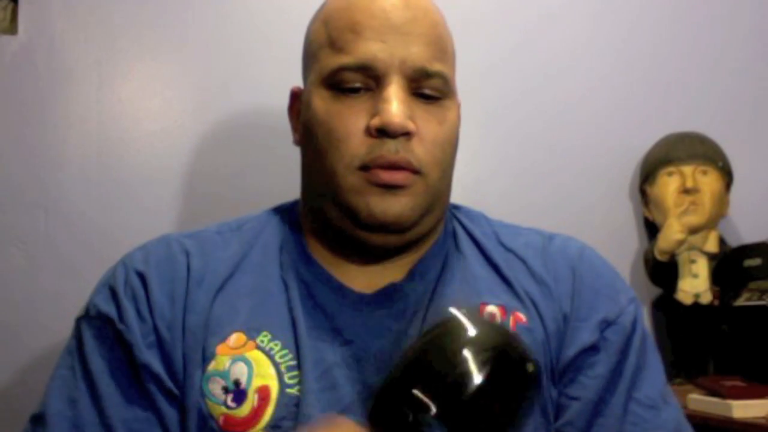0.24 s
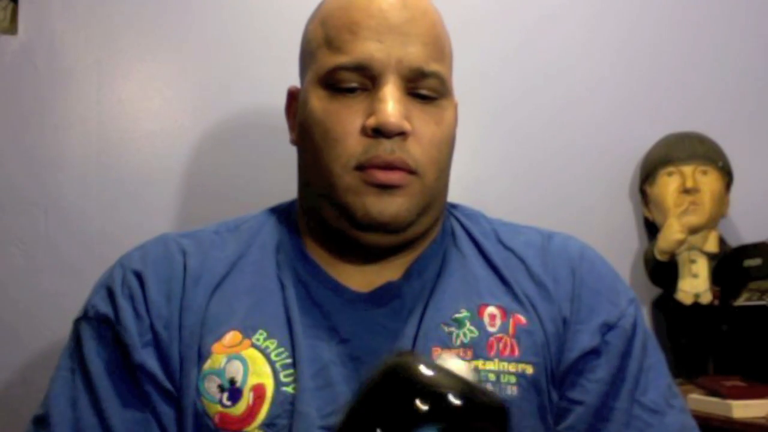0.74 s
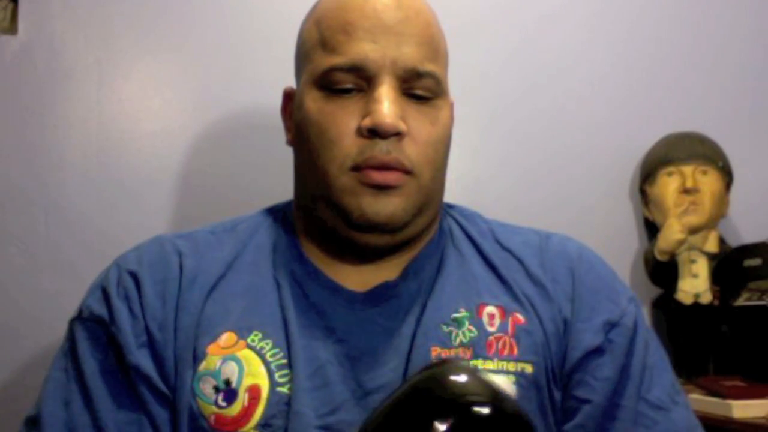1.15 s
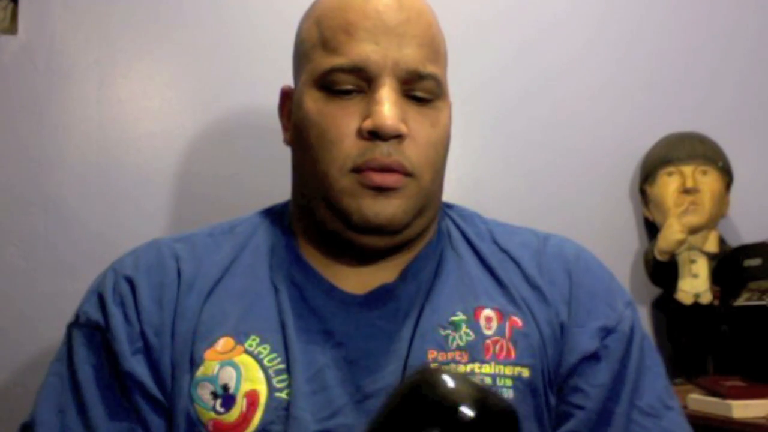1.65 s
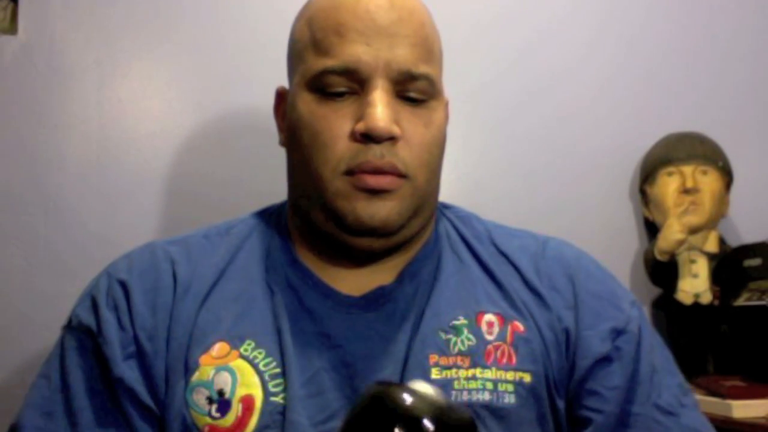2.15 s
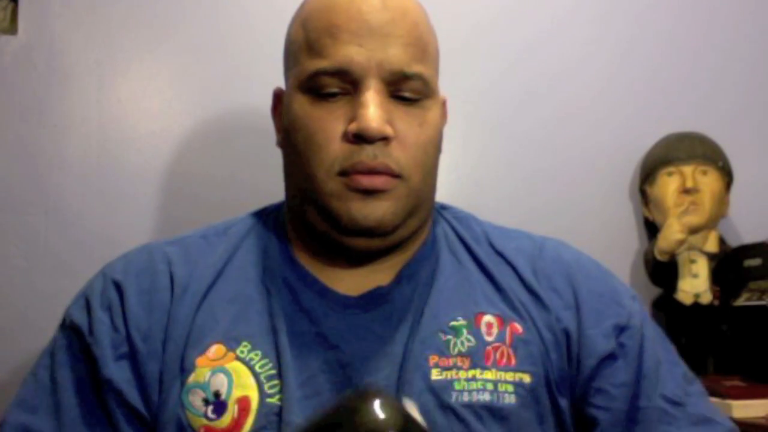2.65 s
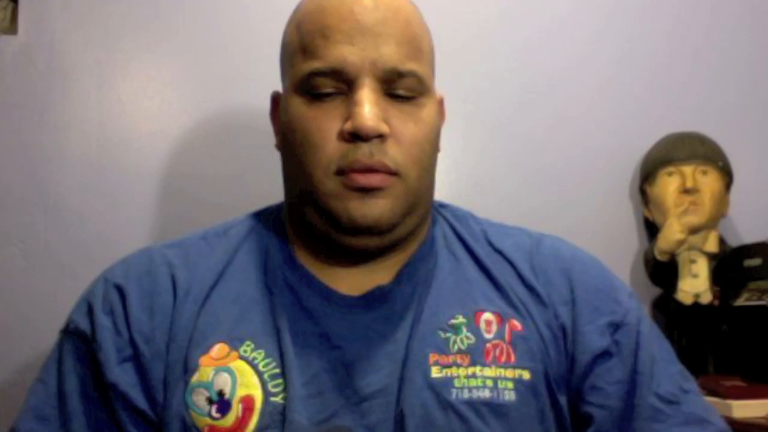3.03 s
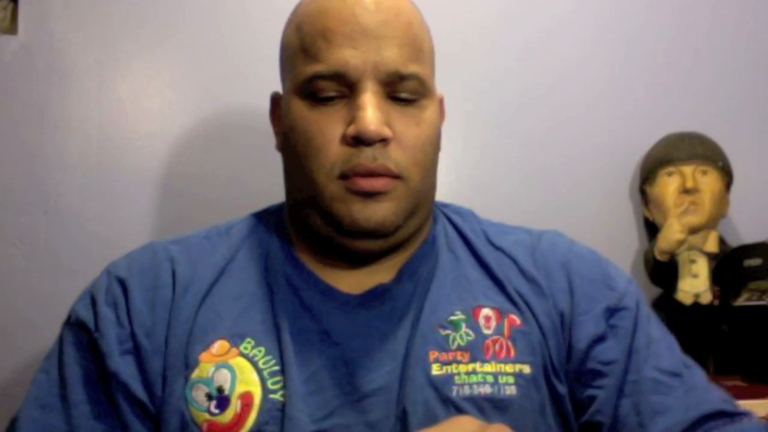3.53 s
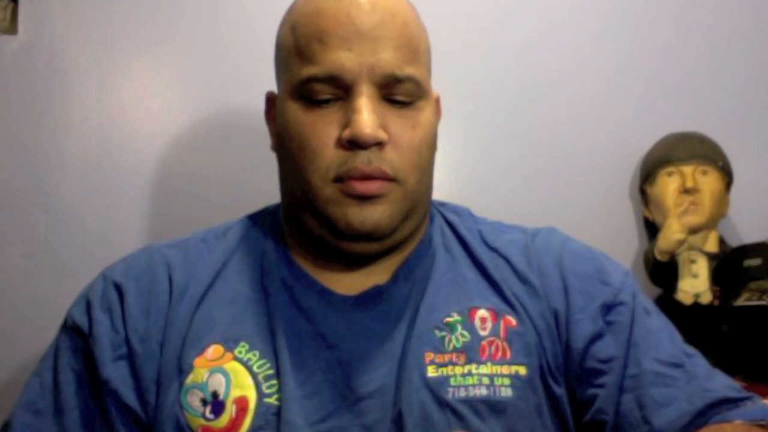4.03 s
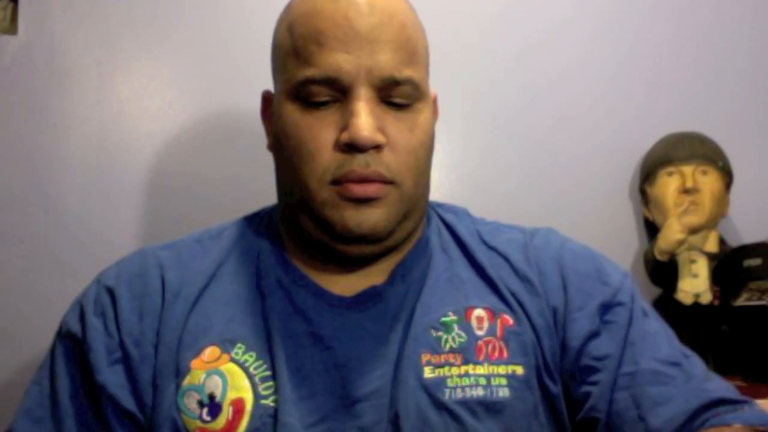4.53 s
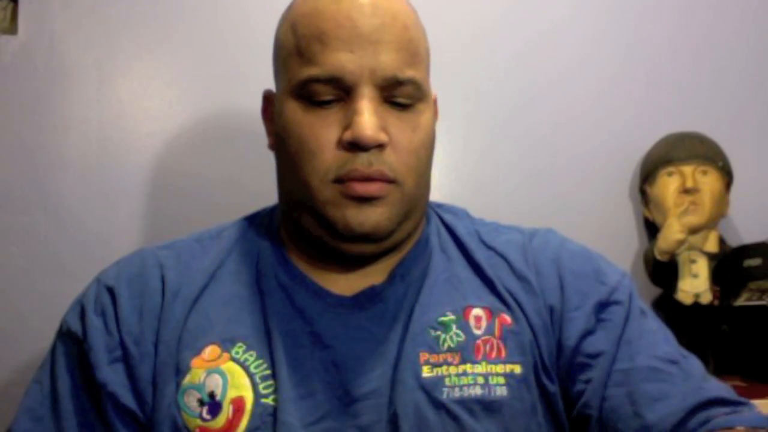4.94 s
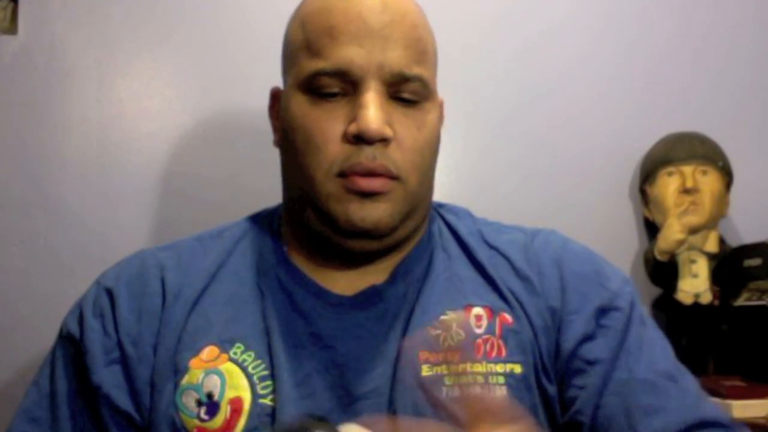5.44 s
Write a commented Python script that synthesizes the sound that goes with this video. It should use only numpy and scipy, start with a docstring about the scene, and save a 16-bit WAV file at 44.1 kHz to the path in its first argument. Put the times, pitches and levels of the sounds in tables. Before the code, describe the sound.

Hands rub and twist a balloon, its skin popping, squeaking briefly and drumming hollowly, in irregular bursts over very faint hiss and hum.

```python
"""A rustling stroke over faint hum and hiss opens a scene of hands twisting a latex balloon in a small room.
The skin sticks and lets go: single snaps, short creaks and squeaks of regular slips, and a rustle of tiny
slips under each stroke. Each slip rings the skin in resonances. Pushes and strokes drum the air chambers
inside, and a hand bumps the desk with a dull decaying tone. A close computer microphone hears it all."""
import sys
import numpy as np
from scipy import signal
from scipy.fft import rfft, irfft, next_fast_len
from scipy.io import wavfile
from scipy.ndimage import map_coordinates

SR = 44100
rng = np.random.default_rng(int(sys.argv[2]) if len(sys.argv) > 2 else 0)


def wav_out(sig):
    """Save sig, one row per channel (or a flat mono array), as 16-bit PCM at SR to the path in sys.argv[1]."""
    wavfile.write(sys.argv[1], SR, np.round(np.clip(np.atleast_2d(sig).T, -1, 1) * 32767).astype(np.int16))


N = 250498

# spectrum of the bright slip noise: frequency_hz, density_db (relative, per Hz)
FIZZ_SPECTRUM = [(2000, -11.5), (3500, -10), (4300, -5.5), (6000, -9), (9000, -15), (12000, -17.5),
                 (16000, -26.5)]
# pushes on the air inside: start_s, level_db (peak, before room and microphone), pitch_hz (favoured chamber)
PUSHES = [(0.108, -27, 500), (0.233, -4, 444), (0.429, -16.5, 290), (0.687, -22, 460), (0.787, -25, 388),
          (0.825, -26, 570), (0.898, -29.5, 480), (1.327, -20.5, 518), (1.415, -29, 470), (1.484, -15, 509),
          (1.52, -16.5, 416), (1.805, -21, 462), (2.195, -5.5, 436), (2.452, -19.5, 368), (2.743, -28, 301),
          (2.854, -29, 457), (2.95, -38.5, 321), (3.092, -31, 327), (3.322, -31.5, 550), (3.483, -33, 593),
          (3.79, -28.5, 560), (4.39, -26, 588), (4.786, -23, 549), (4.896, -19, 628), (5.066, -18.5, 526),
          (5.272, -27.5, 535), (5.548, -35.5, 363), (5.562, -40.5, 387), (5.605, -31.5, 470),
          (5.674, -18.5, 553)]


def amp(db):
    """Decibels to linear gain."""
    return 10 ** (np.asarray(db) / 20)


def unit(x):
    """Scale to an RMS of 1."""
    return x / np.sqrt(np.mean(x ** 2) + 1e-20)


def along(points, hz):
    """Read a curve of (Hz, value) points on a log frequency axis."""
    f, v = np.transpose(points)
    return np.interp(np.log(hz + 1), np.log(f + 1), v)


def wobble(rate):
    """A smooth random curve, rate knots a second."""
    knots = rng.standard_normal(int(N * rate / SR) + 4)
    return map_coordinates(knots, [np.arange(N) * rate / SR])


def filtered(x, response):
    """Filter x by a complex response of frequency."""
    m = next_fast_len(len(x) + SR // 8)
    return irfft(rfft(x, m) * response(np.fft.rfftfreq(m, 1 / SR)), m)[:len(x)]


def mode(f, hz, width_hz):
    """One causal resonance of gain 1 at its centre."""
    return 1j * f * width_hz / (hz * hz - f * f + 1j * f * width_hz)


def add(track, s, sound):
    """Mix a short sound in at time s (seconds)."""
    part = track[round(s * SR):][:len(sound)]
    part += sound[:len(part)]


def slips(rate, spread_db, clump_db, smooth):
    """Tiny random slips of unequal size, in clumps, on a share of smooth friction noise."""
    sizes = amp(spread_db * rng.standard_normal(N))
    signs = np.sign(rng.standard_normal(N))
    happens = rng.random(N) < rate / SR
    friction = unit(sizes * signs * happens) + smooth * rng.standard_normal(N)
    return unit(friction * amp(clump_db * wobble(70)))


def background():
    """Steady hiss, shaped in frequency, and a low hum that wavers in level."""
    # hiss spectrum: frequency_hz, density_db (relative, per Hz)
    hiss_spectrum = [(60, -19), (120, -11.5), (400, -3.5), (900, -50), (3000, -15), (8000, -29),
                     (16000, -40.5)]
    hiss = unit(filtered(rng.standard_normal(N), lambda f: amp(along(hiss_spectrum, f))))
    hum = amp(1.2 * wobble(5)) * np.sin(2 * np.pi * 119 * np.arange(N) / SR)
    return amp(-68.5) * hiss + amp(-74.5) * hum


def crackle():
    """Scattered larger slips over a light rustle, each patch of skin ringing at its own pitch."""
    mix = np.zeros(N)
    for hz in 900 * 1.4 ** np.arange(6):
        grains = slips(150, spread_db=5.5, clump_db=4, smooth=.5)
        mix += filtered(grains, lambda f: mode(f, hz, hz / 4) ** 2) / hz  # higher patches are quieter
    return unit(mix)


def chambers(push, pitch, damping):
    """The grip sets the size of the air chambers that answer a push; damping widens their modes."""
    # air modes: pitch_ratio (to the grip's pitch), width_hz (before damping), level_db
    air_modes = [(.6, 110, -8), (.78, 100, -6), (1, 80, 0), (1.35, 130, -7), (1.8, 200, -14)]

    def response(f):
        low_cut = (1j * f / (170 + 1j * f)) ** 2
        ring = 0
        for k, (ratio, width_hz, db) in enumerate(air_modes):
            ring = ring + (-1) ** k * amp(db) * mode(f, ratio * pitch, damping * width_hz)
        return low_cut * ring

    return filtered(push, response)


def strokes(grains):
    """Sliding hands: coarse slips ring the stretched skin, fine ones fizz with ticks, a shake drums the air."""
    # strokes: start_s, rise_s (before limits), rub_db, pitch_hz (skin ring), drum_db (against the rub)
    stroke_table = [(0, .002, -40.5, 3780, -9), (0.085, 0.033, -43.5, 2900, -34),
                    (0.138, 0.0065, -38, 4340, 4.5), (0.217, 0.035, -32, 2960, 4.5),
                    (0.433, 0.013, -55, 3100, 15), (0.553, 0.11, -36.5, 1090, 11),
                    (0.679, 0.034, -32.5, 1020, 1), (0.787, 0.002, -39, 1000, -1.5),
                    (0.827, 0.0019, -52, 1030, -3), (0.894, 0.031, -40, 1050, 7.5),
                    (1.061, 0.017, -37, 1053, -12.5), (1.307, 0.011, -49.5, 3030, 3),
                    (1.375, 0.1, -44.5, 1740, -4), (1.459, 0.066, -31, 2700, -2),
                    (1.578, 0.086, -39, 3980, -3), (1.675, 0.11, -34, 1156, -8),
                    (1.795, 0.0063, -34, 4600, -22), (1.924, 0.052, -40, 2830, -4.5),
                    (2.07, 0.094, -50.5, 1140, -1.5), (2.196, 0.0036, -22, 2570, -4.5),
                    (2.319, 0.052, -50, 6700, 7.5), (2.409, 0.027, -49, 2660, -10.5),
                    (2.555, 0.056, -50.5, 2940, -5.5), (2.85, 0.02, -46.5, 2820, 0),
                    (2.915, 0.051, -46, 3480, -18), (3.06, 0.025, -41, 1720, -28),
                    (3.095, 0.012, -40, 2910, -14), (3.311, 0.025, -46.5, 5350, 2),
                    (3.365, 0.0055, -45, 866, 3.5), (3.474, 0.054, -44.5, 1780, -16),
                    (3.591, 0.0358, -52.5, 2600, -5), (3.756, 0.059, -41, 1550, -32),
                    (3.85, 0.044, -35, 1780, 3), (4.017, 0.095, -35, 1750, -5),
                    (4.174, 0.082, -30.5, 1040, -4), (4.38, 0.04, -30.5, 1400, -6),
                    (4.48, 0.13, -40, 1096, -12), (4.606, 0.032, -34.5, 870, 4.5),
                    (4.741, 0.019, -47, 2580, 12), (4.78, 0.01, -28, 2680, -4.5),
                    (4.832, 0.065, -40.5, 800, 2.5), (5.047, 0.016, -38, 1349, 3.5),
                    (5.21, 0.042, -47.5, 3100, 12), (5.32, 0.041, -43.5, 3330, 7),
                    (5.401, 0.12, -70, 5900, 14), (5.595, 0.0056, -57.5, 4540, -12)]
    # stretched latex resonances, before the shift to each stroke's pitch: pitch_hz, width_hz, level_db
    skin_modes = [(1074, 570, -3.5), (1680, 540, 4), (2690, 1200, 1.5), (4090, 880, 0.5)]
    # fizz level, which comes and goes from stroke to stroke: time_s, level_db (added to the other fizz terms)
    treble_curve = [(0, -1.5), (.5, 13), (.62, -3), (.7, -18.5), (1.25, 13.5), (1.7, -7), (2.6, 11),
                    (3.1, 5.5), (3.9, 3.5), (4.45, 3), (4.55, -70), (4.63, 7.5), (4.8, 0), (4.9, -34),
                    (5.08, -34.5), (5.22, 6), (5.6, 9)]
    fizz_base_db, fizz_db_per_octave = -6, 3.5  # base for a -37 dB rub at 2 kHz; tight skin fizzes more
    fizz_growth = 0.79  # dB of fizz per dB of rub
    fall_base_s, fall_share = .035, .4  # a fixed time plus a share of the wait for the next stroke
    tightens, slackens = .2, .08  # share of pitch climbed during the rise, and lost per fall time

    coarse = slips(1200, spread_db=5, clump_db=4.5, smooth=0.7)
    fine = slips(2500, spread_db=6, clump_db=4.0, smooth=0.5) + .7 * coarse
    ticks = slips(70, spread_db=3.5, clump_db=3, smooth=0)
    fizz = unit(filtered(fine + 1.11 * ticks, lambda f: amp(along(FIZZ_SPECTRUM, f))))
    shake = slips(300, spread_db=-1.5, clump_db=6.5, smooth=0.82)
    push_s, _, push_hz = np.transpose(PUSHES)
    next_starts = [row[0] for row in stroke_table[1:]] + [N / SR]
    out = np.zeros(N)
    for (start, rise, db, hz, drum_db), after in zip(stroke_table, next_starts):
        rise = np.clip(rise, .003, .3)
        fall = fall_base_s + fall_share * max(after - start - rise, 0)
        span = slice(round(start * SR), round((start + rise + 3 * fall) * SR))
        t = np.arange(len(out[span])) / SR
        swell = np.minimum(t / rise, 1) ** 0.36
        pressure = swell * amp(-18 * np.maximum((t - rise) / fall, 0) ** 1.01)

        # the whole skin follows the ring: shift by the nearest mode's ratio
        shift = min((hz / row[0] for row in skin_modes), key=lambda r: abs(np.log(r)))

        def skin_response(f):
            ring = sum(amp(level) * mode(f, shift * c, shift * w) ** 2 for c, w, level in skin_modes)
            dulling = 1 + (f / (2800 + 1.0 * hz)) ** 4  # slack skin is duller
            return (ring + 1.01 * mode(f, hz, hz / 7)) / dulling

        # slower playback lowers every resonance at once
        stretch = 1 - tightens * np.maximum(1 - t / rise, 0) - slackens * np.maximum(t - rise, 0) / fall
        playback = [np.cumsum(stretch)]
        rub = map_coordinates(filtered(coarse[span], skin_response), playback)

        fizz_db = fizz_base_db + fizz_db_per_octave * np.log2(hz / 2000)
        fizz_db += (fizz_growth - 1) * (db + 37.0)
        fizz_db += np.interp(start + rise, *np.transpose(treble_curve))
        bright = amp(fizz_db) * pressure ** 0.4 * fizz[span]  # light touch is duller
        skin_sound = unit(rub) + 0.54 * grains[span] + bright

        grip_hz = np.interp(start + rise, push_s, push_hz)  # between the neighbouring pushes
        drum = map_coordinates(chambers(shake[span], grip_hz, 1.23), playback)
        add(out, start, amp(db) * pressure * (skin_sound + amp(drum_db) * unit(drum)))
    return out


def room(x):
    """Each frequency dies at its own speed; each tenth of a second gets a fresh random tail."""
    # room decay: frequency_hz, t60_s
    decay_times = [(200, 0.23), (1400, 0.087), (4000, 0.11), (10000, 0.093)]
    out, step = np.zeros(N + SR), SR // 10
    for k in range(0, N, step):  # fresh tails, so no single resonance stands out
        hz, t, z = signal.stft(rng.standard_normal(SR // 4), SR, nperseg=256)
        decay = amp(-60 * t / along(decay_times, hz)[:, None])
        tail = signal.istft(z * decay, SR, nperseg=256)[1]
        echo = signal.fftconvolve(x[k:k + step], tail / np.linalg.norm(tail))
        add(out, (k + 180) / SR, echo)  # pre-delay of 180 samples
    return out[:N]


def thumps():
    """A short rough push sets the chambers ringing, with a pitch that drops as the squeeze lets go."""
    squeeze, squeeze_s = .15, .01  # share by which pitch starts high, and its relaxation time
    out, t = np.zeros(N), np.arange(SR // 5) / SR
    playback = [np.cumsum(1 + squeeze * np.exp(-t / squeeze_s))]
    for s, db, hz in PUSHES:
        rough = t ** .5 * amp(-t / 0.00048) * rng.standard_normal(len(t))
        push = filtered(rough, lambda f: mode(f, hz, hz))  # a palm is soft
        ring = map_coordinates(chambers(push, hz, .6), playback)
        add(out, s, amp(db) * ring / np.abs(ring).max())
    return out


def burst(hz, sharp, source, crack_db):
    """A push on the skin: a ring and its overtone over a bright crack, which slack low-pitched skin hardly gives."""
    def response(f):
        ring = mode(f, hz, hz / sharp)
        overtone = amp(-15.5) * mode(f, 2.88 * hz, hz / 3)
        crack = amp(-11.5) * amp(along(FIZZ_SPECTRUM, f)) * mode(f, 2000, 13000)
        crack = crack * 3j * f / (hz + 3j * f)  # low cut at a third of the ring pitch
        return ring - overtone + amp(crack_db) * np.tanh(hz / 900) ** 2 * crack

    return filtered(source, response)


def snaps():
    """Each snap is a few ms of fast slipping; a stronger one lasts longer."""
    # snaps: start_s, level_db (peak, before room and microphone), pitch_hz (skin ring)
    snap_table = [(0.1388, -11, 3230), (0.1466, -16, 5130), (0.2335, 3, 2840), (0.256, -16, 3830),
                  (0.2755, -20, 1620), (0.3185, -23.5, 1550), (0.351, -23.5, 5400), (0.4278, -15, 3060),
                  (0.481, -22, 3620), (0.5576, -16.5, 3020), (0.579, -15, 1590), (0.62, -23, 4000),
                  (0.666, -15, 4540), (0.6883, -15.5, 1040), (0.6958, -14, 2000), (0.7346, -23, 1570),
                  (0.7875, -18, 1000), (0.8266, -21, 1070), (0.898, -25, 1100), (0.9188, -24, 1000),
                  (0.953, -26, 900), (0.939, -22, 895), (1.0525, -30, 980), (1.2322, -32.5, 2900),
                  (1.314, -26, 2620), (1.326, -9.5, 2800), (1.372, -16, 2540), (1.415, -24, 3080),
                  (1.487, -7.5, 990), (1.5877, -24, 940), (1.5966, -19, 3600), (1.8062, -10.5, 1040),
                  (1.9618, -16.5, 3170), (2.1668, -16.5, 4660), (2.195, 4.5, 4120), (2.4274, -23.5, 7800),
                  (2.59, -21, 844), (2.739, -27, 5470), (2.8547, -24, 1030), (2.9445, -15, 3150),
                  (3.0711, -21, 1700), (3.088, -14.5, 2700), (3.0936, -6, 2620), (3.2171, -28.5, 4500),
                  (3.454, -31.5, 7600), (3.478, -24, 1820), (3.7294, -30, 1290), (3.764, -26, 1640),
                  (3.7889, -22.5, 1560), (3.8169, -19, 1480), (3.8889, -12, 1600), (4.0134, -26.5, 7000),
                  (4.029, -26.5, 1800), (4.0422, -20.5, 4040), (4.1, -18.5, 1690), (4.2226, -9.5, 2580),
                  (4.2362, -9, 1140), (4.403, -17, 1280), (4.4776, -18.5, 900), (4.618, -21, 4170),
                  (4.7457, -22.5, 2760), (4.784, -19.5, 930), (5.2121, -19.5, 2990), (5.32, -24, 855),
                  (5.365, -24.5, 2970), (5.527, -36.5, 7670), (5.6734, -16.5, 2100)]
    length_s, doubles_db = 0.0035, 48  # length of a -26 dB snap; so many dB louder lasts twice as long
    out, t = np.zeros(N), np.arange(SR // 16) / SR
    for s, db, hz in snap_table:
        u = t / (length_s * 2 ** ((db + 26.0) / doubles_db))
        slipping = u ** .5 * amp(-26 * u) * (.5 + rng.standard_normal(len(t)))
        snap = burst(hz, hz / 330, slipping, crack_db=10.5)
        add(out, s, amp(db) * snap / np.abs(snap).max())
    return out


def creaks():
    """Stick and slip at a gliding rate: slow runs creak unevenly and brightly, fast ones squeak."""
    # runs of regular slips: start_s, end_s, first_rate_per_s, last_rate_per_s, level_db, pitch_hz (skin ring)
    creak_table = [(0.607, 0.67, 314, 336, -26.5, 350), (0.652, 0.712, 240, 316, -32, 270),
                   (0.686, 0.713, 340, 345, -30.5, 4540), (2.414, 2.444, 1370, 1620, -43.5, 1480),
                   (2.455, 2.46, 1500, 1300, -42, 1650), (2.583, 2.64, 475, 460, -38.5, 467),
                   (2.916, 2.953, 210, 323, -36, 1800), (4.229, 4.243, 900, 1450, -25, 1300),
                   (4.38, 4.396, 1670, 2200, -38.5, 1820)]
    out = np.zeros(N)
    for start, end, first, last, db, hz in creak_table:
        n = round((end - start) * SR)
        uneven = .12 + 100 / (100 + first)
        rate = np.linspace(first, last, n) * (1 + .2 * uneven * wobble(300)[:n])
        ticks = np.diff(np.floor(np.cumsum(rate) / SR + .9), prepend=0)  # one a cycle
        ticks = ticks * amp(8 * uneven * rng.standard_normal(n))
        swell = np.sin(np.linspace(.6, 2.8, n)) ** 0.49
        source = np.pad(ticks * swell, (0, SR // 100))  # space for the last ring
        add(out, start, amp(db) * unit(burst(hz, 3.6, source, crack_db=30 * uneven - 14)))
    return out


def bumps():
    """A hand on the desk: the dull answer is one low sine with a soft onset and a fast decay."""
    # bumps: start_s, level_db (before onset, decay and microphone)
    bump_table = [(2.197, -20), (2.334, -41)]
    out, t = np.zeros(N), np.arange(SR // 5) / SR
    onset = 1 - amp(-t / 0.00022)
    for s, db in bump_table:
        add(out, s, amp(db - 60 * t / 0.11) * onset * np.sin(2 * np.pi * 135 * t))
    return out


def scene():
    """Mix the balloon with its room answer, the desk and the background."""
    grains = crackle()
    restless_db = 6 * wobble(12)
    fidget = amp(-79.5 + restless_db) * grains  # fingers never rest quite still
    balloon = snaps() + thumps() + creaks() + strokes(grains) + fidget
    return (balloon + amp(-7.5) * room(balloon) + bumps() + background())[None]


def record(dry):
    """The microphone drops deep bass and top treble, dips near 5 kHz, rounds high peaks and ends at its band limit."""
    def response(f):
        bass_cut = (1j * f / (115 + 1j * f)) ** 3
        treble_cut = 1 + (f / 14000) ** 8
        return bass_cut / treble_cut * (1 - 0.5 * mode(f, 4870, 710))

    x = filtered(dry[0], response)
    x = .93 * x / (1 + np.abs(x) ** 6) ** (1 / 6)  # soft limit
    return filtered(x, lambda f: f < 16600)[None]


dry = scene()
out = record(dry)
wav_out(out)
```